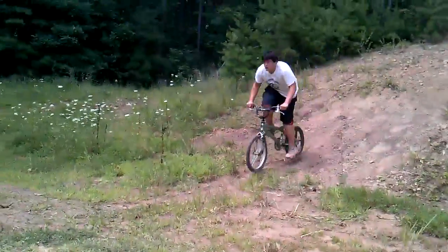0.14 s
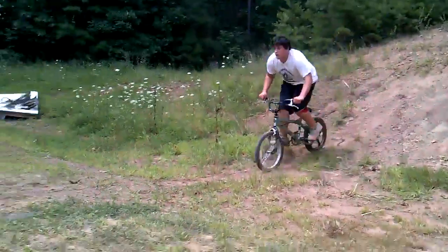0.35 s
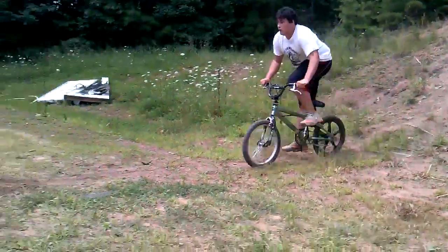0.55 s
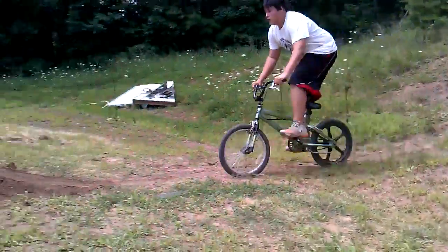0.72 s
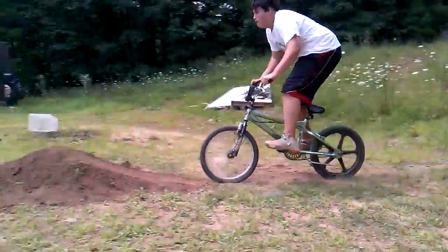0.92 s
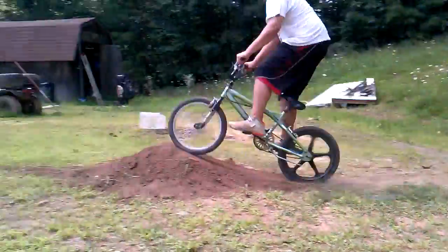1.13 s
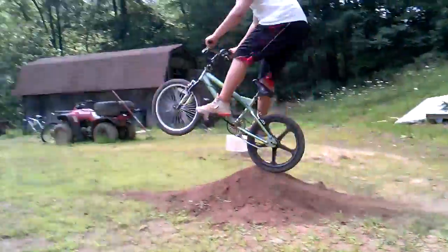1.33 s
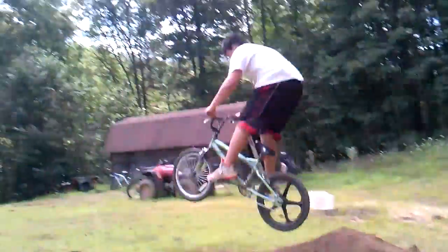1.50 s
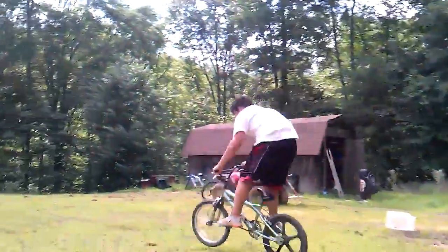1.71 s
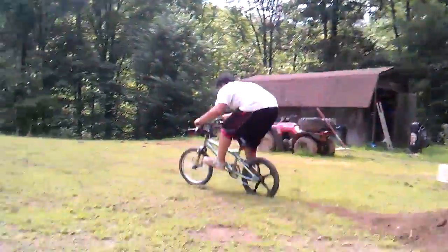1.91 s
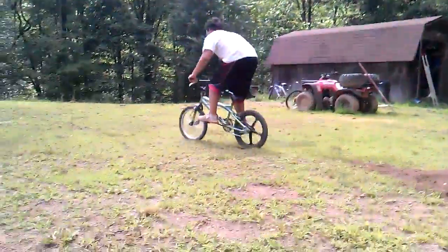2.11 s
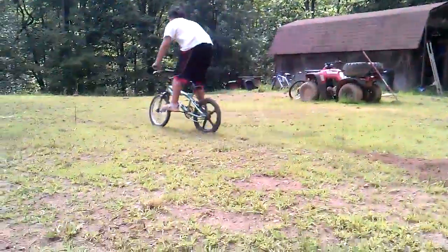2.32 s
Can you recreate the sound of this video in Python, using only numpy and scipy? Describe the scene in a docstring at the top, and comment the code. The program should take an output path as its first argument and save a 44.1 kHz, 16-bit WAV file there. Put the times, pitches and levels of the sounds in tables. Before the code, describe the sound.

A BMX bike rolls over dirt in an open yard, tyres crunching, with small bumps and ticks around 0.2-0.3 s. The freewheel whirr swells near 0.5-0.9 s; a sharp chain slap and knocks mark the mound at 1.0-1.1 s. Rolling drops away in the air, leaving light clinks, until a loud clattering landing at 1.8 s. Rattles fade over grass to faint insect hiss by 2.3 s.

```python
"""BMX coasting over a dirt mound

Out in a yard ringed by trees, insects hiss faintly. A BMX bike coasts down a dirt slope, passes close
by the microphone, jumps a mound, lands and rolls off over grass. Filtered noise makes the freewheel's
whirr; showers of tiny impacts make the tyres' crunch. The slack chain slaps: contacts that clink and
ring modes of steel and frame. Damped tones make loose parts knock and wheels thud; noise bursts tick."""
import sys
import numpy as np
from scipy import signal
from scipy.fft import rfft, irfft
from scipy.io import wavfile

SR = 44100
rng = np.random.default_rng(int(sys.argv[2]) if len(sys.argv) > 2 else 0)


def log_audio(samples):
    """Write samples as a 16-bit WAV file to the path given in sys.argv[1]."""
    # one column per channel
    frames = np.atleast_2d(samples).T
    # limit to full scale, then quantise
    limited = np.clip(frames, -1, 1)
    pcm = np.round(limited * 32767).astype(np.int16)
    wavfile.write(sys.argv[1], SR, pcm)


N = 103635
T = np.arange(N) / SR
TOP_HZ = 15750  # upper limit of the recorder and of the steel's ring


def undb(db):
    """Decibels to gain."""
    return 10 ** (np.asarray(db) / 20)


def unit(x):
    """Scale to an rms of 1."""
    return x / np.sqrt(np.mean(x ** 2))


def burst(x, seconds):
    """Scale a short sound to the energy of an rms of 1 held for that long."""
    return x * np.sqrt(abs(seconds) * SR / np.sum(x ** 2))


def add(out, start, x):
    """Mix a sound in at its time in seconds."""
    i = max(int(start * SR), 0)
    out[i:i + len(x)] += x[:N - i]


def curve(table, axis=1):
    """Gain over time from a column of dB."""
    rows = np.array(table)
    return undb(np.interp(T, rows[:, 0], rows[:, axis]))


def colour(x, points, size=4096):
    """Causal minimum-phase filter through (Hz, dB) points."""
    hz, db = np.array(points).T
    grid = np.maximum(np.arange(size // 2 + 1) * SR / size, 1)
    log_gain = np.log(undb(np.interp(np.log(grid), np.log(hz), db)))
    # folding the cepstrum onto positive times makes the filter causal
    cepstrum = irfft(log_gain)
    cepstrum[1:size // 2] *= 2
    cepstrum[size // 2 + 1:] = 0
    impulse = irfft(np.exp(rfft(cepstrum)))
    return signal.fftconvolve(x, impulse)[:len(x)]


def band(x, low_hz, high_hz, order=2):
    """Band-pass between two edges."""
    edges = np.clip([low_hz, max(high_hz, low_hz + 10)], 5, SR / 2 - 100)
    return signal.sosfilt(signal.butter(order, edges, "band", fs=SR, output="sos"), x)


def grains(n, per_s, scatter_db):
    """Tiny impacts at random times, of random sign; a positive scatter makes a few strong."""
    size = undb(scatter_db * np.minimum(rng.exponential(size=n), 5))
    hits = rng.random(n) < per_s / SR
    return hits * size * np.sign(rng.standard_normal(n))


def walk(rate):
    """Smooth random wander, `rate` new values a second, with a spread near 1."""
    return np.interp(T * rate, np.arange(N // 100), rng.standard_normal(N // 100))


# colour of the still air and the insects in the trees: f/Hz, level/dB
YARD_COLOUR = [(25, 2), (250, -2), (1200, -10), (2200, -14), (5600, -16.5), (6850, 12.5), (7600, 4.5),
               (9300, -7), (11500, -8), (16000, -6)]


def yard():
    """Still air and insects round the yard: coloured noise whose level wavers slightly."""
    level_db = -49.5 + 0.34 * walk(20.8)
    return unit(colour(rng.standard_normal(N), YARD_COLOUR)) * undb(level_db)


# whirr of the freewheel as it reaches the microphone: t/s, level/dB
WHIRR_LEVEL = [(0, -37), (.16, -50), (.44, -39.5), (.56, -34), (.68, -32.5), (.765, -37), (.82, -30.5),
               (1.08, -44), (1.4, -79)]
# resonances of the hub: f/Hz, width/Hz, level before the whirr is levelled/dB
HUB_RESONANCES = [(1916, 420, 4.5), (2870, 1200, -6.5), (3760, 340, 3), (7130, 390, -1), (8900, 1900, -6.5)]


def freewheel():
    """Pawls scrape over the ratchet and sound the hub's resonances."""
    pawl_hz, pawl_depth = 174, 0.17
    phase = np.cumsum(pawl_hz * (1 + 0.0473 * walk(9))) / SR % 1
    scrape = rng.standard_normal(N) * (1 + pawl_depth * np.cos(2 * np.pi * phase))
    hub = np.zeros(N)
    for hz, width, db in HUB_RESONANCES:
        # shuffled samples lose the pawl rhythm and add a steady hiss
        rub = rng.permutation(scrape) * 0.77 + scrape
        hub += undb(db) * band(rub, hz - width / 2, hz + width / 2, order=1)
    return unit(band(hub, 1700, 14200)) * curve(WHIRR_LEVEL)


# tyres on the ground, before lumps and patches: t/s, roll level/dB, grit level/dB
TYRE_LEVELS = [(0, -42.5, -44.5), (.15, -42, -43), (.25, -41.5, -39), (.44, -44.5, -38.5), (.58, -36, -39),
               (.76, -41.5, -36.5), (.94, -42, -39.5), (1.03, -36.5, -32), (1.16, -35, -34.5),
               (1.38, -51.5, -42), (1.55, -57, -47.5), (1.71, -59.5, -50), (1.82, -34, -25.5),
               (1.95, -40.5, -38.5), (2.06, -50.5, -45.5), (2.35, -54.5, -48)]
# colour of the tread's drumming: f/Hz, level/dB
ROLL_COLOUR = [(40, -13), (110, -4), (170, -4), (250, 4), (400, -8), (800, -2.5), (1200, -10.5),
               (2000, -0.5), (3000, -9.5), (5000, -27)]
# colour of crushed grit and dry grass: f/Hz, level/dB
GRIT_COLOUR = [(800, -16), (2200, -11), (4800, -8.5), (6200, -2), (7100, 1.5), (7900, -2), (9200, 6),
               (11000, -6.5), (13500, -11.5), (16000, -45)]


def tyres():
    """Tread drums over lumpy, patchy dirt and crushes grit and dry grass."""
    roll = unit(colour(grains(N, per_s=1800, scatter_db=2), ROLL_COLOUR)) * curve(TYRE_LEVELS)
    lumps = undb(1.8 * walk(16))
    grit = unit(colour(grains(N, per_s=3700, scatter_db=3.5), GRIT_COLOUR))
    grit = grit * curve(TYRE_LEVELS, axis=2)
    patches = undb(0.9 * walk(160))
    return (roll * lumps + grit) * patches


def clack(hz):
    """A heavily damped contact between two parts: a tone that swells and dies at once."""
    t, rise_s = T[:SR // 10], 0.00063
    return t / rise_s * np.exp(1 - t / rise_s) * np.sin(2 * np.pi * hz * t)


def rattle():
    """Small stones and loose parts clack at random, each at its own pitch, following the tyre roll."""
    per_s, centre_hz, level_db = 190, 1777, -7  # level relative to the roll curve
    out = np.zeros(N)
    for when, pitch, size in rng.random((int(per_s * N / SR), 3)):
        octaves = 2 * np.sqrt(pitch) - 4 / 3  # averages zero, crowded towards the top
        add(out, when * N / SR, size ** 2 * clack(centre_hz * 2 ** octaves))
    return unit(out) * undb(level_db) * curve(TYRE_LEVELS)


# deep buffets of air and ground at the microphone: t/s, level/dB, decay/s
BUFFETS = [(0, -41, 0.008), (0.191, -45.5, 0.01), (0.223, -42, 0.011), (0.959, -49, .012),
           (1.135, -67, 0.038), (1.8, -41, 0.024)]


def buffets():
    """Air and ground push at the microphone: dying bursts of very low noise."""
    out, t = np.zeros(N), T[:SR // 3]
    for start, db, decay in BUFFETS:
        gust = band(rng.standard_normal(len(t)) * np.exp(-t / decay), 24.8, 81, order=3)
        add(out, start, undb(db) * burst(gust, decay))
    return out


# dull blows on the wheels (bumps, jolts in the air, the landing):
# t/s, level before halving/dB, f/Hz, decay/s
THUDS = [(0.035, -31.5, 350, 0.0043), (0.185, -33, 450, 0.013), (0.1963, -20, 374, 0.0018),
         (0.229, -28.5, 434, 0.0064), (0.277, -29.5, 435, 0.0033), (1.103, -32, 252.6, 0.023),
         (1.308, -42.5, 285, 0.0087), (1.493, -40, 782, 0.0098), (1.562, -39, 940, 0.0036),
         (1.718, -37.5, 206, 0.0071), (1.802, -20.5, 140, 0.0037), (1.812, -42.5, 290, 0.0035),
         (1.823, -23.5, 127, 0.0045)]


def thuds():
    """Each blow sets the tyre swinging in a decaying sine while dirt shudders under it."""
    shudder_db, shudder_span = -1.5, 2.8  # level relative to the swing; top edge over pitch
    out, t = np.zeros(N), T[:SR // 3]
    for start, db, hz, decay in THUDS:
        fade = np.exp(-t / decay)
        swing = burst(np.sin(2 * np.pi * hz * t) * fade, decay)
        dirt = rng.standard_normal(len(t)) * np.sqrt(fade)
        shudder = burst(band(dirt, hz / 2, hz * shudder_span), decay)
        add(out, start, undb(db) * (swing + undb(shudder_db) * shudder) * 0.5)
    return out


# sharp ticks of grit and chain links: t/s, level/dB, decay/s, upper edge f/Hz
TICKS = [(0.066, -23.5, 0.00065, 12400), (0.2273, -18.5, 0.003, 9700), (.2695, -21, 0.0031, 11200),
         (0.3056, -17.5, 0.0026, 10700), (0.5428, -18, 0.0011, 10300), (.640, -23, 0.0018, 11900),
         (.862, -25, 0.00068, 11900), (0.971, -20.5, 0.0052, 11000), (1.3087, -22.5, 0.0029, 13500)]


def ticks():
    """Single bright contacts of grit and links: high bands of quickly dying noise."""
    out, t = np.zeros(N), T[:SR // 40]
    for start, db, decay, top_hz in TICKS:
        tick = band(rng.standard_normal(len(t)) * np.exp(-t / decay), 7550, top_hz)
        add(out, start, undb(db) * burst(tick, 0.0016))
    return out


# knocks of loose parts in the frame: t/s, level/dB, f/Hz
KNOCKS = [(.228, -21.5, 2350), (.2775, -29, 2170), (.736, -22, 1640), (0.8107, -16.5, 1900),
          (1.0497, -13.5, 1900), (1.0888, -22, 2100), (1.310, -22.5, 2420), (1.3759, -26.5, 1850),
          (1.4941, -29.5, 1490), (1.632, -33, 1650), (1.7289, -26, 1570), (1.8215, -5, 2070),
          (1.8269, -23, 1860), (1.837, -22.5, 1770), (1.8502, -20, 2060), (1.8897, -24, 1730),
          (1.919, -12.5, 1850), (1.9472, -24.5, 1850), (1.9719, -20.5, 2030), (2.0143, -29.5, 1910)]


def knocks():
    """Play in the frame closes with a clack and a brief chatter."""
    chatter_db, chatter_decay_s = -16.5, 0.0054
    out, t = np.zeros(N), T[:SR // 10]
    for start, db, hz in KNOCKS:
        contacts = grains(len(t), per_s=900, scatter_db=4)
        chatter = unit(band(contacts, hz * 0.3, hz * 2)) * np.exp(-t / chatter_decay_s)
        add(out, start, undb(db) * (clack(hz) + undb(chatter_db) * chatter))
    return out


def modes(push, hz, db, t60):
    """Ringing modes, all driven by one push; t60 is the time to fall by 60 dB."""
    poles = np.exp((2j * np.pi * hz - np.log(1000) / t60) / SR)
    total = np.zeros(len(push))
    for gain, pole in zip(undb(db), poles):
        total += gain * unit(signal.lfilter([1], [1, -pole], push).imag)
    return unit(total)


# chain slaps: t/s, level/dB, length of the scrape/s, frame body level/dB, ring level/dB,
# favoured partial f/Hz (body and ring are relative levels inside the slap)
SLAPS = [(0.666, -23.5, 0.0023, -26, -0.5, 7170), (0.871, -25.5, 0.0033, -11, -15, 9540),
         (0.923, -23, 0.0057, -35, 1, 8450), (.946, -19.5, 0.0059, -49, 6, 8400),
         (.9985, -9.5, 0.0056, -15, 0, 9680), (1.017, -21, 0.0024, -9, -23, 6900),
         (1.054, -22.5, 0.0083, -24, 4, 8850), (1.2341, -21.5, 0.0076, -13, 1.5, 6710),
         (1.332, -21.5, 0.0011, -17.5, -18, 8700), (1.3733, -20, 0.0045, -12.5, 0, 7280),
         (1.391, -26, 0.0027, -14.5, 12, 10500), (1.4875, -24.5, 0.0096, -11.5, 3.5, 9200),
         (1.6019, -20.5, 0.0031, -57, -1.5, 9800), (1.628, -37.5, 0.0075, -5, 3, 7200),
         (1.732, -22.5, 0.0039, -10, -13, 8700), (1.758, -22, 0.0067, -16, -9, 8700),
         (1.774, -16, 0.00065, -38, -6, 8500), (1.781, -27, 0.009, -6.5, -19, 8450),
         (1.8203, -15.5, 0.0023, -13, -3, 9040), (1.828, -12.5, 0.0034, -18, -9, 9190),
         (1.836, -27, 0.027, -28, -15, 8450), (1.863, -21.5, 0.0031, -35, -19, 9540),
         (1.896, -28, 0.0044, -24, -14, 9700), (1.926, -29, 0.0088, -8.5, -25, 9540),
         (1.973, -33.5, 0.002, -8, -6, 9100), (2.017, -40, 0.036, -8, -7, 9540),
         (2.098, -32, 0.0028, -8, 6, 6080)]
# modes of the steel before random detuning and scatter: f/Hz, level/dB
STEEL_MODES = [(6570, 19.5), (6820, 11), (7170, 18), (7480, 18), (7970, 16), (8450, 12.5), (9190, 14.5),
               (9540, 10), (10200, -4), (10500, 6)]
# colour of metal contacts: f/Hz, level/dB
CLINK_COLOUR = [(1000, -50.5), (5600, -16.5), (6800, 3.5), (9200, 12), (11000, 6), (13000, -4.5),
                (16000, -15.5)]
# low modes of the frame before random detuning and scatter: f/Hz, level/dB
FRAME_MODES = [(800, 4), (1460, 6), (1750, 4), (2220, 11), (3400, 5.5), (5450, 0)]


def chain():
    """Showers of link contacts clink, shake the frame and ring the steel, one partial favoured."""
    attack_s, release_s = 0.00014, 0.0037
    steel_t60_s, frame_t60_s = 0.045, 0.024
    steel_detune_hz, frame_detune = 70, 0.05  # the frame's is a fraction of each pitch
    favour_db, mode_scatter_db = 22, 4
    out, t = np.zeros(N), T[:SR // 5]
    steel_hz, steel_db = np.array(STEEL_MODES).T
    frame_hz, frame_db = np.array(FRAME_MODES).T
    for start, level_db, length, body_db, ring_db, favoured_hz in SLAPS:
        env = np.minimum(t / attack_s, 1) * np.exp(-np.maximum(t - length, 0) / release_s)
        push = env * grains(len(t), per_s=5000, scatter_db=-2.5)

        detune, strength = rng.standard_normal((2, len(steel_hz)))
        ring_hz = np.r_[steel_hz + steel_detune_hz * detune, favoured_hz]
        partial_db = np.r_[steel_db + mode_scatter_db * strength, favour_db]
        ring = band(modes(push, ring_hz, partial_db, steel_t60_s), 5700, TOP_HZ)
        clink = unit(colour(push, CLINK_COLOUR))
        metal = unit(clink + undb(ring_db) * ring)

        detune, strength = rng.standard_normal((2, len(frame_hz)))
        body_hz = frame_hz * (1 + frame_detune * detune)
        body = modes(push, body_hz, frame_db + mode_scatter_db * strength, frame_t60_s)

        slap = band(metal + undb(body_db) * body, 840, 19500)
        add(out, start, undb(level_db) * burst(slap, length + release_s))
    return out


def surroundings(bike):
    """Weak scatter from ground and trees: the bike smeared by a short decaying noise."""
    level_db, t60_s, delay_s = -19.5, 0.04, 0.007
    t = T[:SR // 2]
    scatter = rng.standard_normal(len(t)) * (t > delay_s) * np.exp(-np.log(1000) * t / t60_s)
    echo = signal.fftconvolve(bike, scatter / np.linalg.norm(scatter))[:N]
    return undb(level_db) * echo


def scene():
    """The bike, its scatter from the surroundings, and the yard, on one channel."""
    rolling = freewheel() + tyres() + rattle()
    blows = buffets() + thuds() + ticks() + knocks() + chain()
    bike = rolling + blows
    return (bike + surroundings(bike) + yard())[None]


def record(dry):
    """The recorder rounds the highest peaks and cuts the top."""
    rounded = np.tanh(dry)
    return signal.sosfilt(signal.ellip(10, 0.2, 70, TOP_HZ, fs=SR, output="sos"), rounded)


dry = scene()
out = record(dry)
log_audio(out)
```